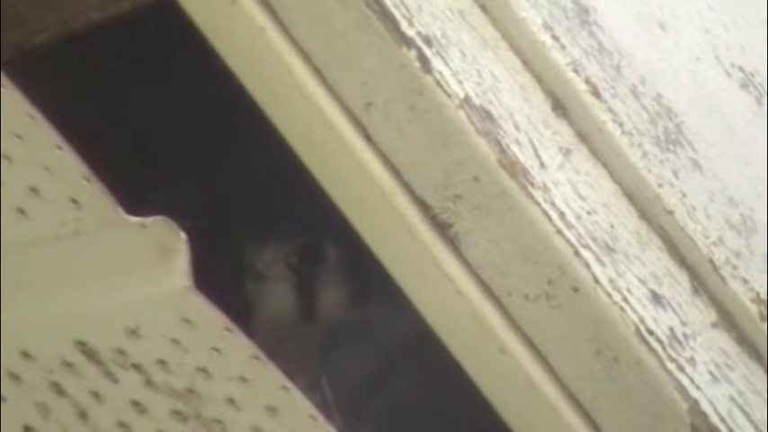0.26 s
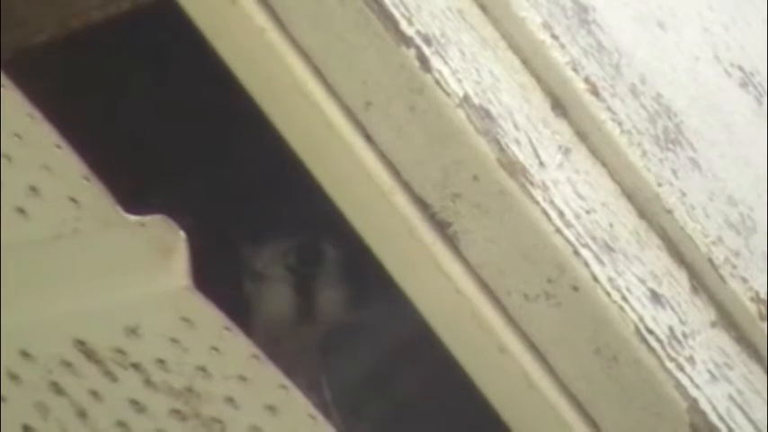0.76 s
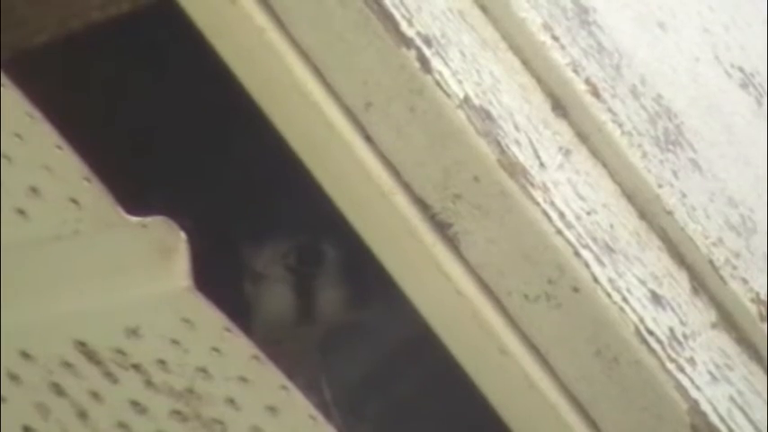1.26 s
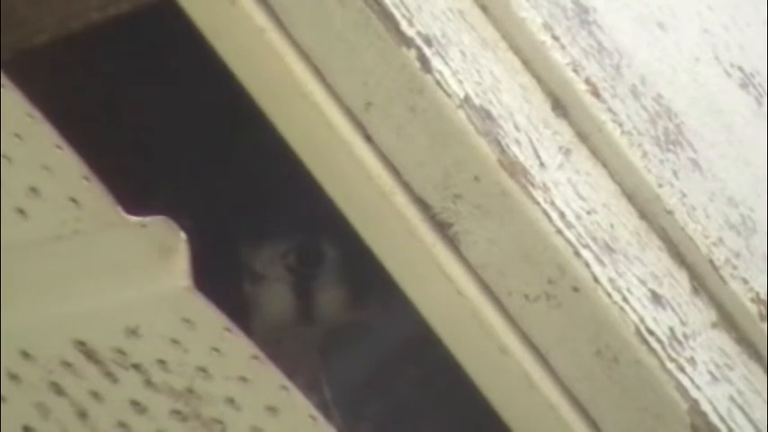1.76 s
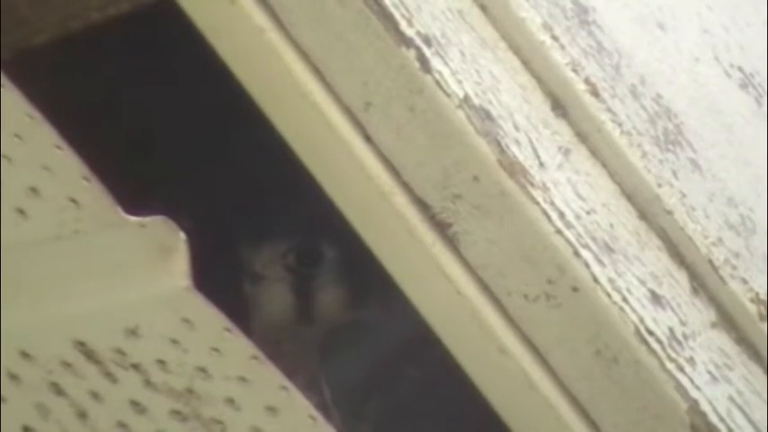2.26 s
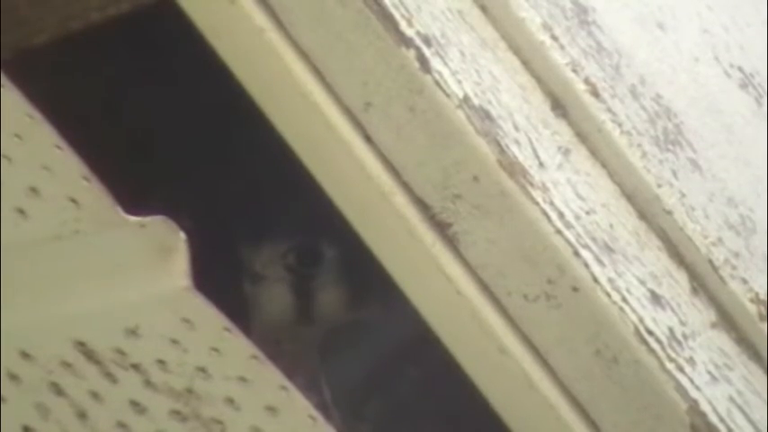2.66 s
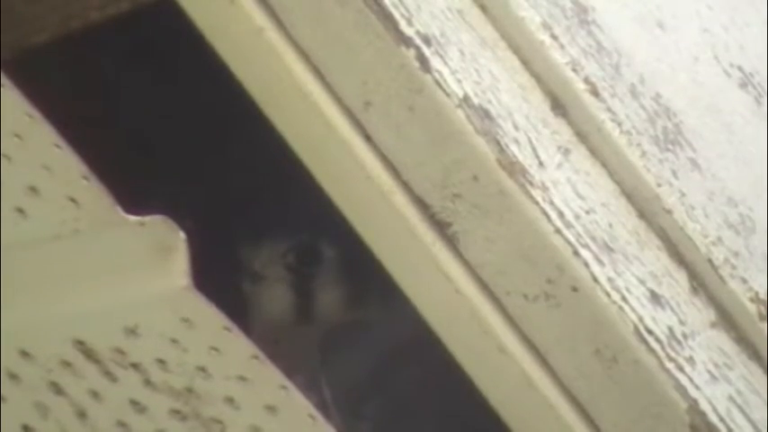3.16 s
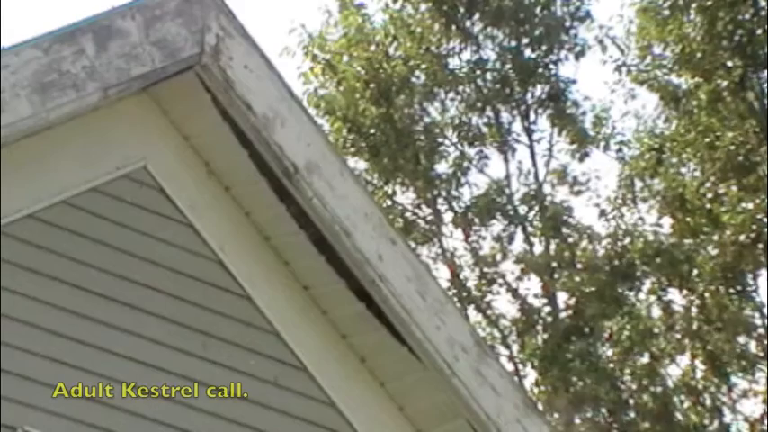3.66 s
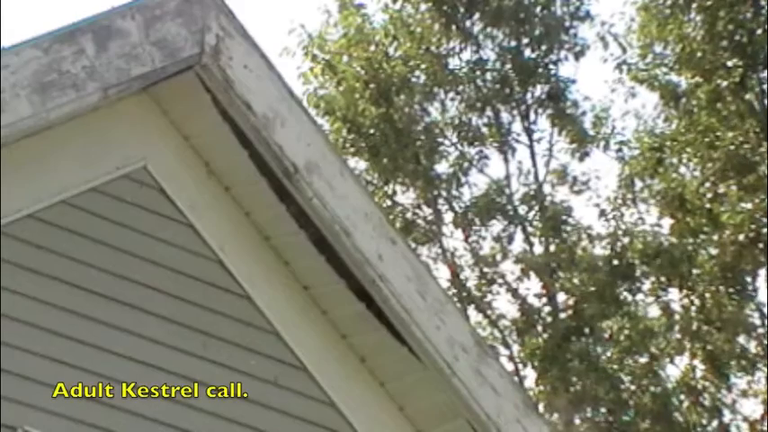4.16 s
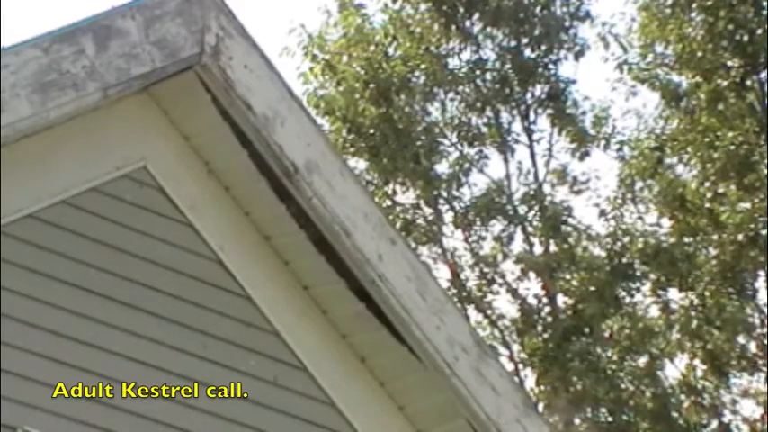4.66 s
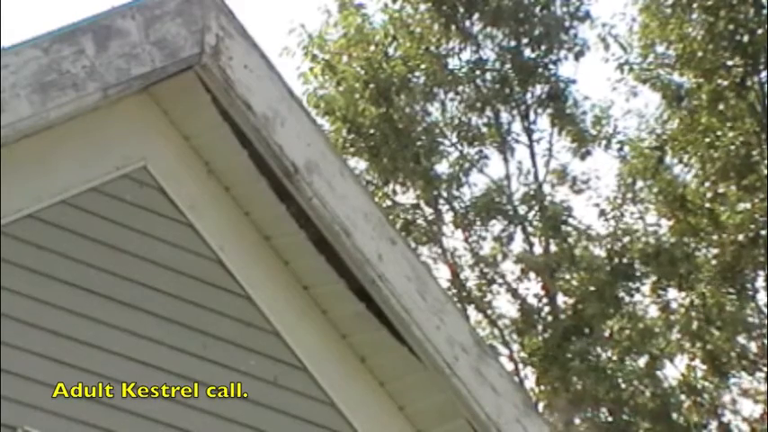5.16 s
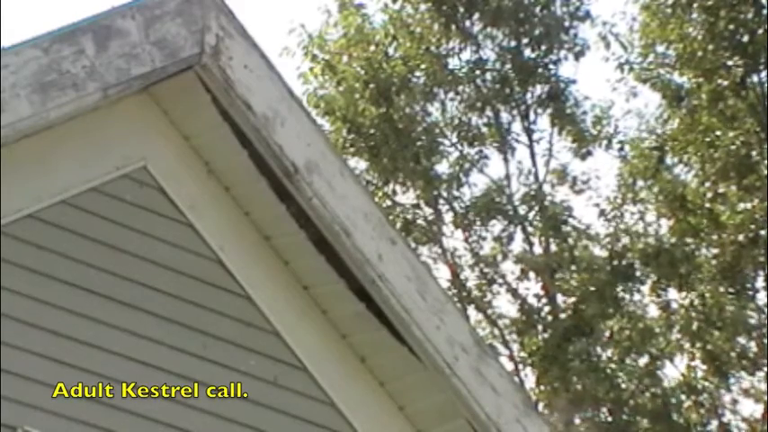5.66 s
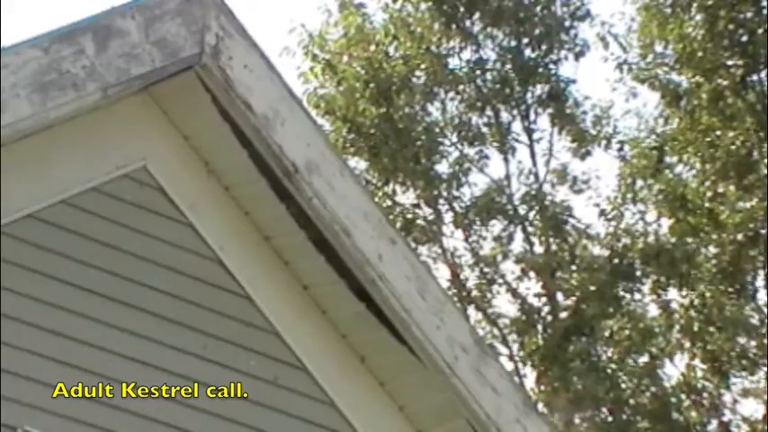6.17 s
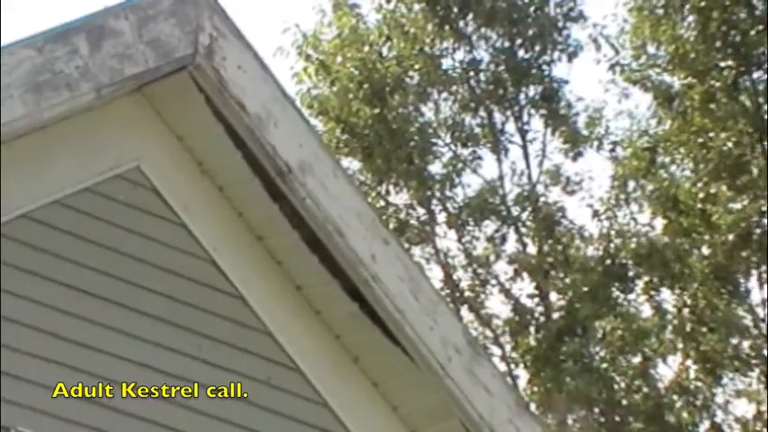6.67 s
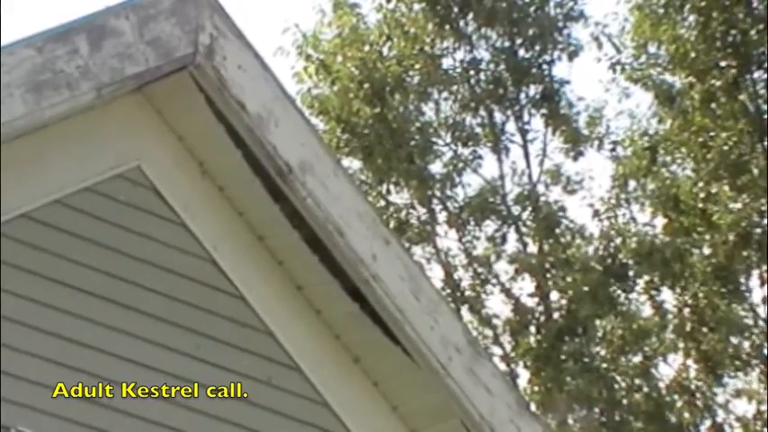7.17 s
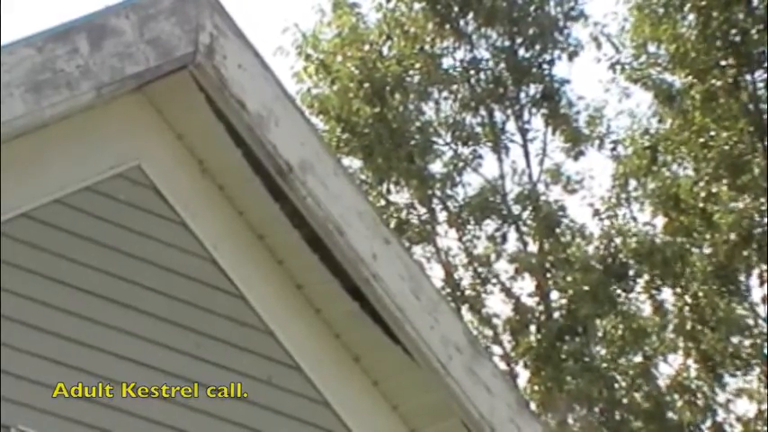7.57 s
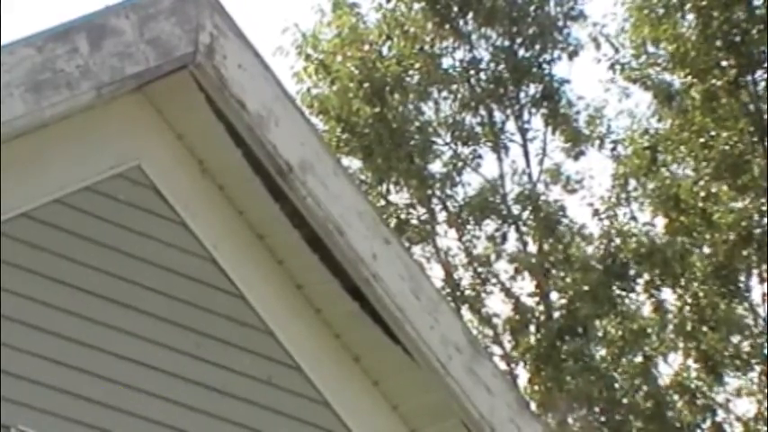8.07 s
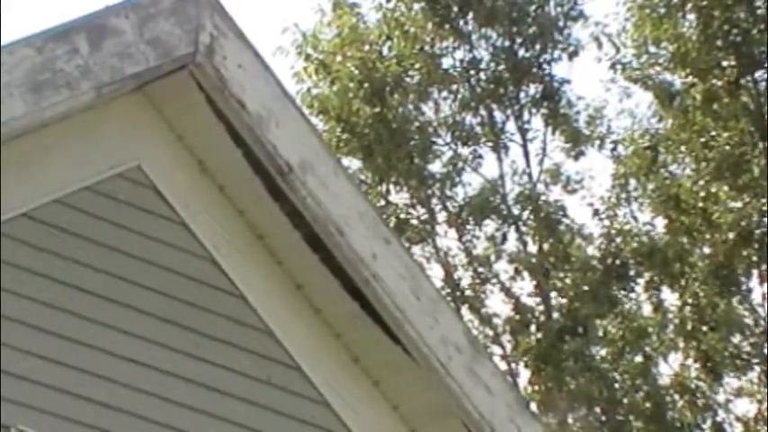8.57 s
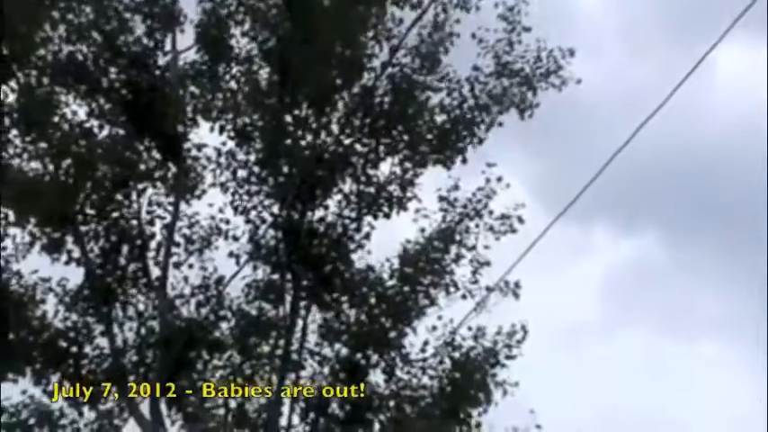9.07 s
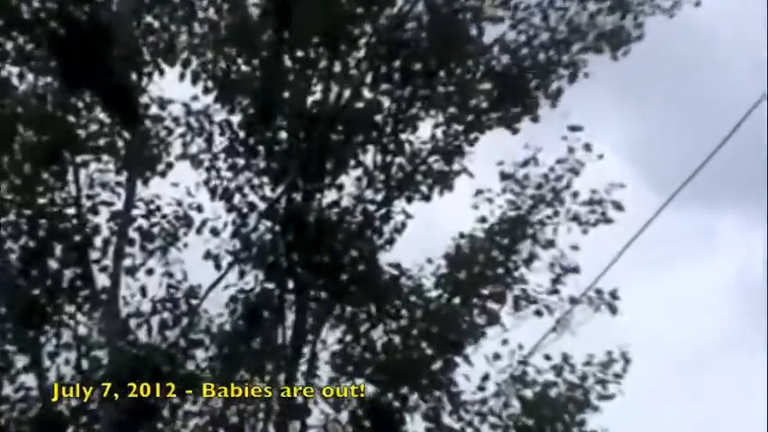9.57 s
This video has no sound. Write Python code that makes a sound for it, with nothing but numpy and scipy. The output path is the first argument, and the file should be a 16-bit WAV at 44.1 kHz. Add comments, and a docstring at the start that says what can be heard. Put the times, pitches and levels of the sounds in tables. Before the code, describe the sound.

Outdoors, a small motor hums under light wind, then traffic swells while a falcon shrieks a rapid string of doubled notes and a hoarser young one answers.

```python
"""First heard outdoors: a small motor hums in soft hiss, gusts push the microphone and a far tone swells once.
After a brief fade traffic swells and recedes, while an adult kestrel by a house wall calls in doubled notes.
After a second fade, in a quieter place with a low far drone, a hoarser young bird calls from the left.
The motor is pulses ringing a housing; road, wind and air are shaped noise; engine and drone are sines.
Each bird is a gliding set of harmonics through fixed throat resonances, with echoes at two microphone ports."""
import sys
import numpy as np
from scipy import signal
from scipy.fft import rfft, irfft, next_fast_len
from scipy.io import wavfile
from scipy.ndimage import uniform_filter1d, map_coordinates

SR = 44100
rng = np.random.default_rng(int(sys.argv[2]) if len(sys.argv) > 2 else 0)


def unload_wav(signal):
    """Save mono or channel-first audio to the path in sys.argv[1] as 16-bit WAV at rate SR, clipped to [-1, 1]."""
    wavfile.write(
        sys.argv[1],
        SR,
        np.round(np.clip(np.atleast_2d(signal).T, -1, 1) * 32767).astype(np.int16),
    )


N = 433503
T = np.arange(N) / SR
FIRST_FADE_S, SECOND_FADE_S = 3.425, 8.668  # the silent midpoints between the three stretches


def amp(db):
    """Decibels to gain."""
    return 10 ** (np.asarray(db) / 20)


def unit(x):
    """x scaled to rms 1."""
    return x / np.sqrt(np.mean(x ** 2) + 1e-20)


def along(points, hz):
    """Read (frequency, value) points at hz, on a log frequency axis."""
    point_hz, values = np.transpose(points)
    return np.interp(np.log(hz + 1), np.log(point_hz + 1), values)


def curve(rows):
    """Read (time, value) rows at every sample."""
    times, values = np.transpose(rows)
    return np.interp(T, times, values)


def wobble(rate, size=N):
    """A smooth random curve with rate knots a second."""
    knots = rng.standard_normal(int(size * rate / SR) + 4)
    return map_coordinates(knots, [np.arange(size) * rate / SR])


def swell(s, width):
    """A smooth bell-shaped rise and fall around time s."""
    return np.exp(-((T - s) / width) ** 2)


def phase(hz):
    """Running phase in radians of a changing frequency."""
    return 2 * np.pi * np.cumsum(hz) / SR


def filtered(x, response):
    """x times a complex response of frequency."""
    m = next_fast_len(N + SR // 2)
    spectrum = rfft(x, m) * response(np.fft.rfftfreq(m, 1 / SR))
    return irfft(spectrum, m)[..., :N]


# Likeness of the noise at the two channels: (frequency [Hz], correlation)
LIKENESS = [(50, 0.59), (130, 0.93), (300, 0.95), (700, 0.88), (3000, 0.68), (7000, 1), (15000, 0.2)]


def rush(spectrum, patchy_db):
    """Stereo noise of rms 1, its gain varying in patches of time and frequency."""
    z = signal.stft(rng.standard_normal((2, N)), nperseg=512)[2]
    field = uniform_filter1d(rng.standard_normal(z.shape[1:]), size=6, axis=0)
    field = uniform_filter1d(field, size=16, axis=1)
    pair = signal.istft(z * amp(patchy_db * unit(field)), nperseg=512)[1][:, :N]

    def mid_side_gain(hz):
        # The mid/side balance sets how alike left and right are.
        angle = np.arccos(np.clip(along(LIKENESS, hz), -1, 1)) / 2
        return amp(along(spectrum, hz)) * [np.cos(angle), np.sin(angle)]

    mid, side = filtered(pair, mid_side_gain)
    return unit(np.array([mid + side, mid - side]))


# Hiss of the first place: (frequency [Hz], relative density [dB per Hz])
AIR_SPECTRUM = [(190, -41), (330, -1.5), (381, -10), (486, -6.5), (660, -7.5), (692, -7.5), (1160, -9),
                (1630, -9.5), (3360, -11.5), (6600, -18), (15500, -40)]


def quiet_air():
    """Soft broadband hiss of the first stretch, as filtered noise."""
    return amp(-51.5) * rush(AIR_SPECTRUM, patchy_db=0.5) * (T < FIRST_FADE_S)


# Still air of the last place: (frequency [Hz], relative density [dB per Hz])
STILL_SPECTRUM = [(25, -17), (70, 5.5), (130, -2), (250, -6.5), (700, -6), (1400, -5.5), (2000, -11),
                  (3500, -13.5), (7000, -15), (11000, -22.5), (15500, -33)]


def drone(hz=97, db=-54.5):
    """A far machine hums as one gently wavering sine in still, hissing air."""
    tone = amp(db + .6 * wobble(5.7)) * np.sqrt(2) * np.sin(2 * np.pi * hz * T)
    still_air = amp(-53.0) * rush(STILL_SPECTRUM, patchy_db=1.0)
    return (tone + still_air) * (T >= SECOND_FADE_S)


def far_hoot(s=2.98, width=0.2, hz=505, db=-60):
    """A faint, fuzzy low tone, a narrow band of noise, swells once in the distance."""
    noise = rng.standard_normal(N)
    band = unit(filtered(noise, lambda f: 1 / (1 + ((f - hz) / 35) ** 4)))
    return amp(db) * band * swell(s, width)


def leaves(s=3.66, width=0.21, db=-52):
    """A brief bright rustle in the trees, as a swell of treble noise."""
    # (frequency [Hz], relative density [dB per Hz])
    hiss = rush([(1500, -32), (4000, 5), (6500, 3), (9000, -24), (15000, -38)], patchy_db=-1.0)
    return amp(db) * hiss * swell(s, width) * (T >= FIRST_FADE_S)


# Faint dry ticks: (time [s], level at the onset [dB])
TICK_TIMES = [(6.613, -38), (6.924, -34), (7.213, -43)]


def ticks(t60=0.019):
    """Short, dry, bright ticks: noise that starts at once and dies away within t60 seconds."""
    envelope = sum(amp(db - 60 * np.abs(T - s) / t60) * (T >= s) for s, db in TICK_TIMES)
    return filtered(envelope * rng.standard_normal(N), lambda hz: 1 / (1 + (hz / 11000) ** 4))


# Gusts on the microphone: (time of the peak [s], width [s], level before flutter [dB])
GUST_TIMES = [(1.42, 0.21, -43.5), (2.2, 0.34, -37), (3.25, 0.18, -38.5), (4.72, 0.061, -28.5),
              (4.98, 0.18, -29.5), (5.65, 0.093, -27.5), (6.17, 0.17, -32.5)]
# Wind noise at the microphone: (frequency [Hz], relative density [dB per Hz])
GUST_SPECTRUM = [(20, -24), (45, -5), (90, 3), (220, -8.5), (400, -20.5), (1500, -39), (4000, -120)]
LULL_DB = -57.5  # the breeze between gusts, before flutter


def wind(common_db=-10):
    """Gusts buffet the microphone, mostly pushing its two channels in opposite directions."""
    strength = amp(LULL_DB) + sum(amp(db) * swell(s, width) for s, width, db in GUST_TIMES)
    flutter = amp(1.6 * wobble(22))
    side, mid = (unit(rush(GUST_SPECTRUM, patchy_db=1.5)[0]) for _ in range(2))
    push = amp(common_db) * mid + np.array([side, -side])
    return strength * flutter * push * (T < SECOND_FADE_S)


# The motor in the first stretch: (time [s], level [dB])
MOTOR_LEVEL = [(0, -40), (2.38, -40.5), (2.48, -42.5), (3.4, -43)]
# Resonances of its housing: (frequency [Hz], width [Hz], relative level [dB])
HOUSING_MODES = [(154.2, 23.2, 4), (237.5, 18.7, -2.5)]
MOTOR_LATER_DB = -49  # under the traffic


def motor():
    """One soft thump a turn rings the housing, whose resonances turn the pulses into a hum."""
    first = T < FIRST_FADE_S
    db = np.where(first, curve(MOTOR_LEVEL), MOTOR_LATER_DB)
    turns_per_s = np.where(first, 29.66, 30.85) * (1 + .002 * wobble(4))
    thumps = np.diff(np.floor(np.cumsum(turns_per_s) / SR), prepend=-1)

    def housing(f):
        modes = sum(amp(g) * 1j * f * w / (c * c - f * f + 1j * f * w) for c, w, g in HOUSING_MODES)
        return modes / (1 + (f / 312) ** 8)

    hum = unit(filtered(thumps, housing))
    return amp(db) * hum * amp([[-.7], [.7]]) * (T < SECOND_FADE_S)  # a little to the right


# Shared course of the road noise, before each layer's offset: (time [s], level [dB])
TRAFFIC_LEVEL = [(3.55, -39.5), (4.1, -39.5), (4.35, -37.5), (5.0, -38.5), (5.9, -40.5), (6.8, -40),
                 (7.07, -41.5), (7.35, -40), (8.55, -45)]
# Course of the low mids, before their offset: (time [s], level [dB])
LOW_MID_LEVEL = [(3.6, -38.5), (4.1, -48), (4.4, -44), (4.9, -49), (5.8, -41), (6.8, -41.5), (7.1, -45),
                 (7.45, -41.5), (7.9, -49.5), (8.5, -50.5)]
# Colours of the four noise layers: (frequency [Hz], relative density [dB per Hz])
RUMBLE_SPECTRUM = [(15, -39), (25, -16), (38, -20), (63, -10), (87, -1), (172, -3), (280, -8.5), (360, -47),
                   (620, -120)]
LOW_MID_SPECTRUM = [(60, -55), (170, -23), (270, -0.5), (340, 2.5), (480, -3.5), (700, -22), (2000, -120)]
ROAD_SPECTRUM = [(150, -63), (380, -20), (540, -2), (720, 3.5), (970, -1), (1400, -36), (4000, -120)]
TYRE_SPECTRUM = [(590, -26.5), (1000, -1.5), (1270, -1.5), (1900, -5.5), (2110, -6.5), (2310, -7.5),
                 (2710, -9), (3870, -15), (6050, -19), (15500, -44.5)]
# The engine's swells, before waver: (time of the peak [s], width [s], level [dB])
ENGINE_SWELLS = [(4.15, 0.5, -36), (6.1, 0.53, -41.5)]
# The vehicle's whine, before waver: (time [s], frequency [Hz])
WHINE_PITCH = [(6.5, 205.7), (8.6, 185.6)]
RUMBLE_DB, LOW_MID_DB, ROAD_DB, TYRES_DB, WHINE_DB = -.5, -1, -3.5, -0.9, -12.5  # against the level curves
DULLING_DB_PER_S = 0.13  # the tyre hiss fades faster as the traffic recedes
FIRING_HZ, SAG_HZ_PER_S = 99.7, 3.7  # firing rate as the stretch begins and how it sinks, before waver


def vehicle_line(hz, gain):
    """A sine whose pitch and level waver, as one line of the vehicle's sound."""
    level = gain * amp(2.4 * wobble(7))
    return level * np.sqrt(2) * np.sin(phase(hz * (1 + 0.004 * wobble(9))))


def traffic():
    """Layers of road noise swell and recede while an engine's firing note and a whine sink."""
    level_db = curve(TRAFFIC_LEVEL)
    since = T - FIRST_FADE_S
    rumble = amp(level_db + RUMBLE_DB) * rush(RUMBLE_SPECTRUM, patchy_db=1.5)
    low_mids = amp(curve(LOW_MID_LEVEL) + LOW_MID_DB) * rush(LOW_MID_SPECTRUM, patchy_db=1.5)
    road = amp(level_db + ROAD_DB) * rush(ROAD_SPECTRUM, patchy_db=1.5)
    tyre_db = level_db + TYRES_DB - DULLING_DB_PER_S * since
    tyres = amp(tyre_db) * rush(TYRE_SPECTRUM, patchy_db=1.07)
    engine_gain = sum(amp(db) * swell(s, width) for s, width, db in ENGINE_SWELLS)
    engine = vehicle_line(FIRING_HZ - SAG_HZ_PER_S * since, engine_gain)
    # The whine stands out as the vehicle leaves.
    whine_gain = amp(level_db + WHINE_DB) + amp(-48) * swell(7.2, width=.5)
    whine = vehicle_line(curve(WHINE_PITCH), whine_gain)
    heard = rumble + low_mids + road + tyres + engine + whine
    return heard * amp([[-.5], [.5]]) * ((T >= FIRST_FADE_S) & (T < SECOND_FADE_S))


# Decay of the diffuse tail: (frequency [Hz], time to fall 60 dB [s])
TAIL_DECAY = [(2000, 0.59), (6000, 0.39), (9000, 0.24), (15000, 0.15)]


def outdoors(x, early_db, early_t60, tail_db, apart):
    """The direct sound, quick reflections from near walls and a faint tail from trees."""
    t = np.arange(SR // 2) / SR
    early = rng.standard_normal((3, len(t))) * amp(-60 * t / early_t60) * (t > .001)
    hz, frames, z = signal.stft(rng.standard_normal((3, len(t))), SR, nperseg=256)
    decay = amp(-60 * frames / along(TAIL_DECAY, hz)[:, None])
    tail = signal.istft(z * decay, SR, nperseg=256)[1][:, :len(t)]
    echo = amp(early_db) * early / np.linalg.norm(early[0])
    echo = echo + amp(tail_db) * tail / np.linalg.norm(tail[0])
    # The two ports sit close together and share most of the echoes.
    at_ports = (echo[0] + apart * echo[1:]) / np.hypot(1, apart)
    return x + signal.fftconvolve(x[None], at_ports, axes=1)[:, :N]


def ports(x, lead, left_db):
    """A sound reaches the two microphone ports with a small difference in phase and level."""
    half = np.array([[.5], [-.5]])
    return filtered(x, lambda hz: np.exp(1j * half * along(lead, hz))) * amp(half * left_db)


def add(out, s, sound):
    """Mix a sound into out at time s."""
    part = out[round(s * SR):][:len(sound)]
    part += sound[:len(part)]


def syrinx(pitch, chaos, throat, flutter_db, rasp, doubling, attack, release):
    """One note whose six harmonics sweep through fixed throat resonances, at rms 1 before its gate."""
    n = len(pitch)
    t = np.arange(n) / SR
    edges = np.minimum(t / attack, (n / SR - t) / release)
    gate = np.sin(np.pi / 2 * np.clip(edges, 0, 1))
    turn = phase(pitch)
    tone = np.zeros(n)
    for k in range(1, 7):
        harmonic_db = along(throat, k * pitch) + flutter_db * k * wobble(233, n)
        tone += amp(harmonic_db) * np.sin(k * turn)
    # Alternate cycles differ, which puts partials halfway between the harmonics.
    roughness = rasp * wobble(2000, n) + doubling * np.sin(turn / 2)
    return gate * unit(tone * (1 + chaos * roughness))


# The young bird's calls: (time [s], length [s], top pitch [Hz], level before its shape [dB],
# depth of its slurs [1 = usual])
YOUNG_CALLS = [(8.626, 0.095, 2975, -30.5, 0.86), (8.784, 0.096, 3043, -32.5, 0.93),
               (8.945, 0.092, 3013, -33.5, 0.93), (9.103, 0.096, 2980, -34.5, 0.94),
               (9.265, .099, 2980, -33.5, 0.99), (9.45, 0.097, 2970, -35.5, 1.14),
               (9.625, 0.1, 2962, -35, 1.08), (9.817, 0.094, 2960, -42, 1.06)]
# Its one call shape, a rasp, a slur down, a clear whistle and a flick down:
# (share of the call [0-1], pitch over the top pitch, level [dB], hoarseness [0 = clear])
YOUNG_SHAPE = [(0, .70, -6, .1), (0.071, .93, -9.5, 0.7), (.2, .955, -10, 1.23), (.32, .91, -5.5, 0.64),
               (0.409, .78, -1, 0), (.48, .75, -10, 0.48), (.57, .81, 0, .35), (.63, 1.015, 1, .05),
               (.8, .985, 2, 0.14), (.94, .99, 2.5, 0.1), (1, .68, 0, .05)]
# Its throat and beak: (frequency [Hz], relative gain [dB])
YOUNG_RESONANCES = [(2000, -28.5), (2600, -17), (2950, -7.5), (3800, -18), (4600, 7.5), (5300, -1),
                    (6000, 1.5), (7000, -6), (8000, -16), (9000, -9), (10500, -15.5), (12000, -21),
                    (13500, -38), (15500, -30)]
# Phase by which the left port leads the right: (frequency [Hz], lead [rad])
YOUNG_LEAD = [(1200, 0), (3000, .25), (8000, .35), (10200, 1), (12600, 3)]


def young():
    """A wavering, scratchy voice to the left, whose two notes are slurred into one call."""
    voice = np.zeros(N)
    share, *shape = np.transpose(YOUNG_SHAPE)
    for s, length, top_hz, db, depth in YOUNG_CALLS:
        n = int(length * SR)
        progress = np.linspace(0, 1, n) + .012 * wobble(45, n)
        ratio, level, chaos = (uniform_filter1d(np.interp(progress, share, c), size=80) for c in shape)
        pitch = top_hz * (1 - depth * (1 - ratio))
        scratch = .018 * wobble(230, n) + (.006 + .034 * chaos) * wobble(2400, n)
        note = syrinx(pitch * (1 + scratch), chaos, YOUNG_RESONANCES, flutter_db=.8,
                      rasp=.65, doubling=.3, attack=.001, release=.0015)
        # In the rasp the fundamental stays firm while the overtones break up.
        firm = amp(-5) * chaos ** 2 * np.sin(phase(pitch))
        add(voice, s, amp(db + level) * (note + firm))
    heard = outdoors(voice, early_db=-10, early_t60=.08, tail_db=-10.5, apart=.6)
    return ports(heard, YOUNG_LEAD, left_db=5.4) * (T >= SECOND_FADE_S)


# The adult's throat and beak: (frequency [Hz], relative gain [dB])
ADULT_RESONANCES = [(2300, -24), (2780, -16), (2960, -11.5), (4100, 0), (4750, 5.5), (5250, 2), (5780, 4),
                    (6350, 1.5), (7100, -2), (8200, -23.5), (9200, -12), (10500, -16), (12000, -27),
                    (15500, -34.5)]
# Swell of a hoarse arch, which peaks on the way down: (level at even steps [dB])
HOARSE_LEVEL = [-5, -4.5, -8.5, -4.5, -1.5, -1, 1.5, 3, -2]
FOOT_HZ = 2260  # a clear arch starts and ends near here, a hoarse one a little higher
FOOT_DB = -37  # level at the foot of a clear arch, unless that is within 5 dB of its top
SNAP_DB, SNAP_S = -6, .011  # a clear note is weaker until the voice snaps in
BREAK_DB = 3.5  # hoarse crests and arch feet break into spurts of this depth


def arch(length, top_hz, square, hoarse, level_db):
    """An arch of pitch, loudest at the top if clear; chaotic at the crest if hoarse, else at its edges."""
    n = int(length * SR)
    u = np.linspace(-1, 1, n)
    sag = np.abs(u) ** square
    sag = sag + hoarse * (u > 0) * (np.sin(np.pi / 2 * sag) ** 2 - sag)  # hoarse notes level out at the end
    foot_hz = min(FOOT_HZ + 120 * hoarse, .89 * top_hz)
    chaos = hoarse * np.clip(1 - ((u + .1) / .65) ** 2, 0, 1)
    edge = sag * np.where(u < 0, 1, .8) * (1 - .65 * hoarse)
    waver = (.003 + .014 * chaos + .012 * edge) * wobble(260, n)
    scratch = (.001 + .031 * chaos + .058 * edge) * wobble(1800, n)
    pitch = (top_hz + (foot_hz - top_hz) * sag) * (1 + waver + scratch)
    before_snap = np.clip((SNAP_S - np.arange(n) / SR) / .002, 0, 1)
    clear_db = min(FOOT_DB - level_db, -5) * sag + SNAP_DB * before_snap
    hoarse_db = np.interp(u, np.linspace(-1, 1, len(HOARSE_LEVEL)), HOARSE_LEVEL)
    spurts_db = BREAK_DB * (chaos + sag) * wobble(397, n)
    db = level_db + (1 - hoarse) * clear_db + hoarse * hoarse_db + spurts_db
    note = syrinx(pitch, chaos + edge, ADULT_RESONANCES, flutter_db=1.1,
                  rasp=.75, doubling=.55, attack=.0015, release=.004)
    return amp(db) * note


# The adult's calls, each a lead note, often hoarse, and then a clear one:
# (time [s], lead top [Hz], lead level [dB], lead hoarseness [clipped to 0-1],
# clear note's delay [s], clear top [Hz], clear level [dB]); levels are before the arch's swell
ADULT_CALLS = [(4.350, 2060, -38, .03, .072, 3016, -25.5), (4.549, 2920, -24.5, 0.17, 0.056, 2980, -24),
               (4.717, 2845, -29, .55, .056, 3093, -24), (4.881, 2950, -24.5, 0.12, 0.055, 2986, -25.5),
               (5.037, 2935, -24.5, 0.1, 0.056, 3005, -24.5), (5.196, 2840, -31, 0.7, .054, 3080, -23),
               (5.353, 2900, -28.5, 0.46, .054, 2954, -24.5), (5.509, 2710, -33, 0.64, 0.057, 3007, -24.5),
               (5.67, 2680, -34, 0.84, 0.056, 2950, -24), (5.848, 2720, -36, 0.8, 0.055, 2930, -27),
               (6.019, 2610, -34, .9, 0.057, 2970, -22), (6.200, 2700, -34, 0.9, 0.057, 2990, -19),
               (6.390, 2710, -35, 1.11, 0.056, 2980, -25), (6.566, 2670, -37, 1.1, 0.058, 2860, -28.5),
               (6.783, 2396, -32, .08, 0.051, 2915, -28.5)]
# Phase by which the left port leads the right: (frequency [Hz], lead [rad])
ADULT_LEAD = [(4500, 0), (9000, 0.21), (14000, -0.55)]
LEAD_S, CLEAR_S = .052, .049  # lengths of the two notes
LEAD_SQUARE = 1.6  # squareness of the lead note's arch (2 = parabola)
FRESH_SQUARE, TIRED_SQUARE = 3.88, 2.0  # the clear note's arch rounds off as the string goes on


def adult():
    """Clear ringing notes by a wall, each led by another note, mostly lower and hoarser."""
    voice = np.zeros(N)
    squares = np.linspace(FRESH_SQUARE, TIRED_SQUARE, len(ADULT_CALLS))
    for (s, lead_hz, lead_db, hoarse, delay, top_hz, db), square in zip(ADULT_CALLS, squares):
        lead_note = arch(LEAD_S, lead_hz, LEAD_SQUARE, np.clip(hoarse, 0, 1), lead_db)
        clear_note = arch(CLEAR_S, top_hz, square, hoarse=0.1, level_db=db)
        add(voice, s, lead_note)
        add(voice, s + delay, clear_note)
    heard = outdoors(voice, early_db=-7.5, early_t60=.045, tail_db=-18, apart=.21)
    return ports(heard, ADULT_LEAD, left_db=-0.6)


def scene():
    """The background of each stretch, then the birds over it."""
    air = quiet_air() + drone() + far_hoot() + leaves() + ticks() + wind()
    machines = motor() + traffic()
    return air + machines + young() + adult()


def record(dry):
    """Fades of 0.1 s down and up join the stretches; nothing is kept from 15.8 kHz up."""
    fades = [np.minimum(np.abs(T - s) / .1, 1) for s in (FIRST_FADE_S, SECOND_FADE_S)]
    return filtered(dry * np.prod(fades, axis=0), lambda hz: hz < 15800)


dry = scene()
out = record(dry)
unload_wav(out)
```